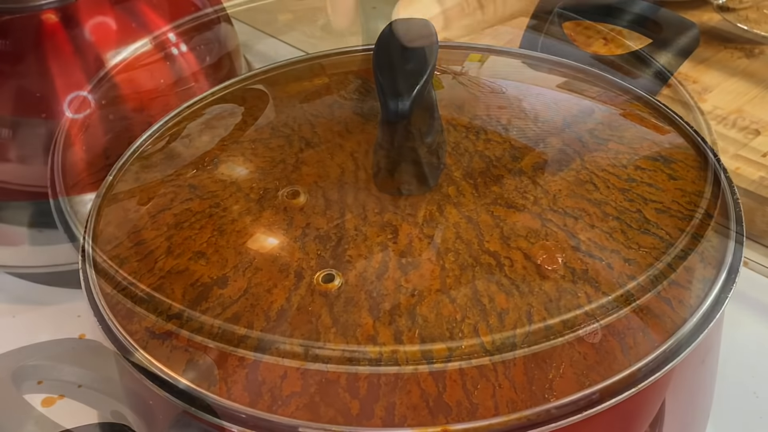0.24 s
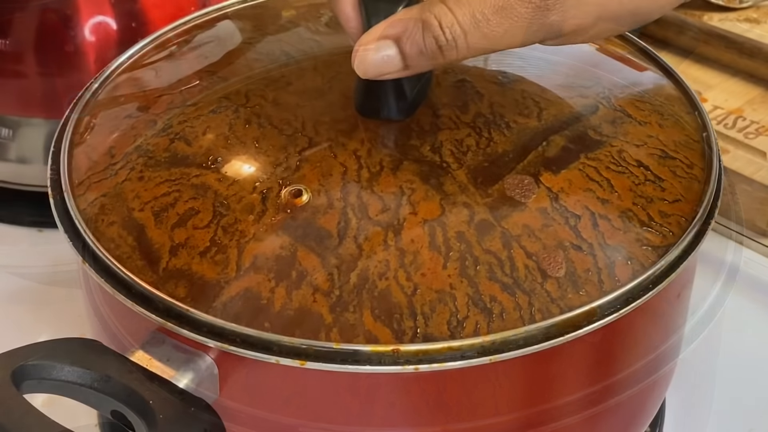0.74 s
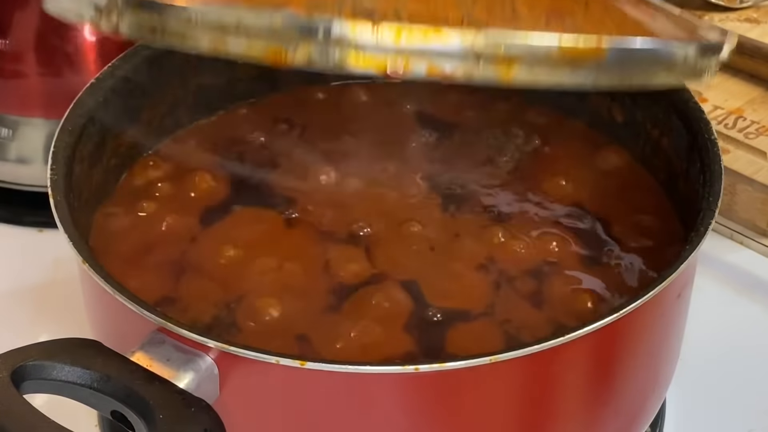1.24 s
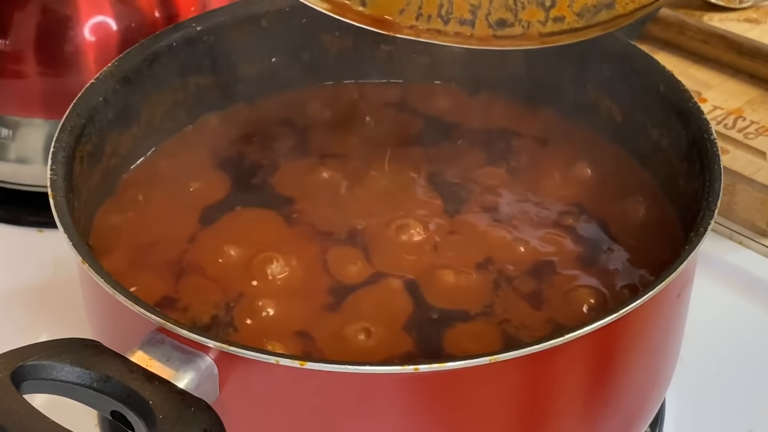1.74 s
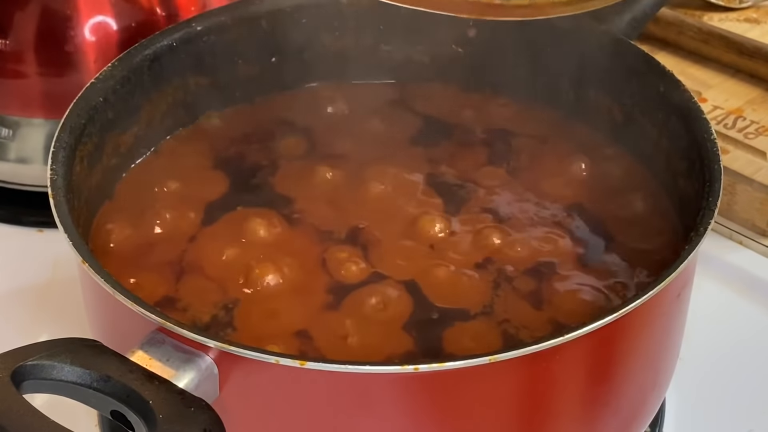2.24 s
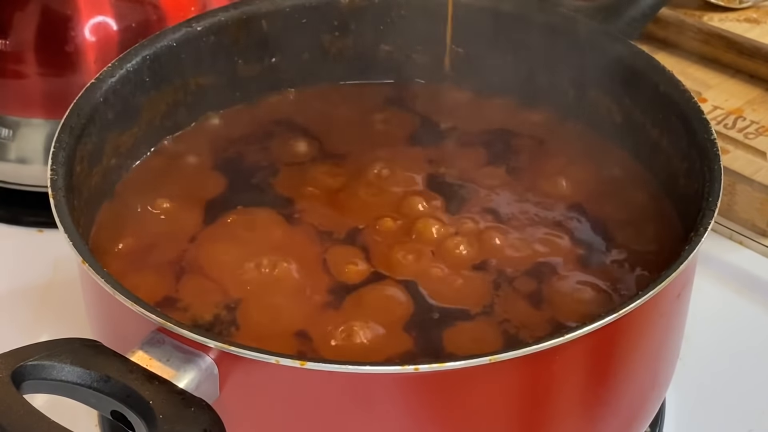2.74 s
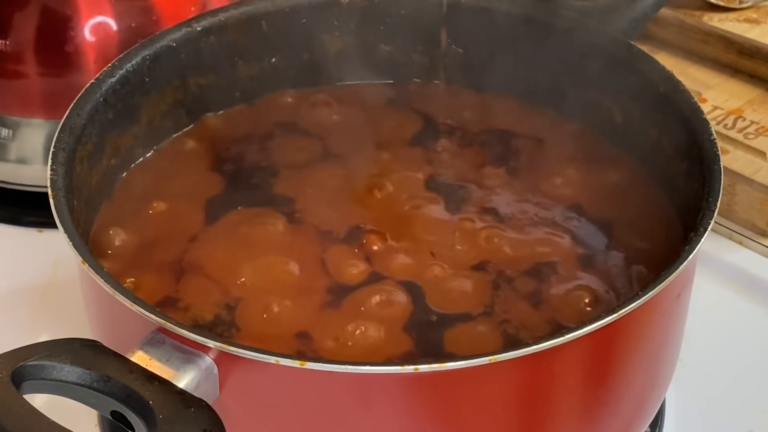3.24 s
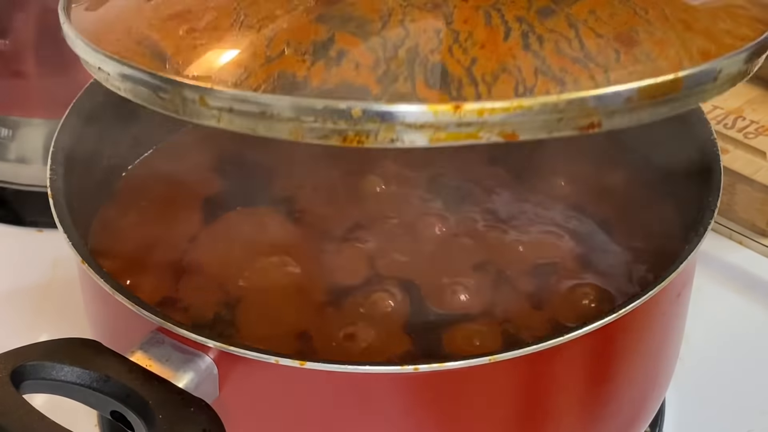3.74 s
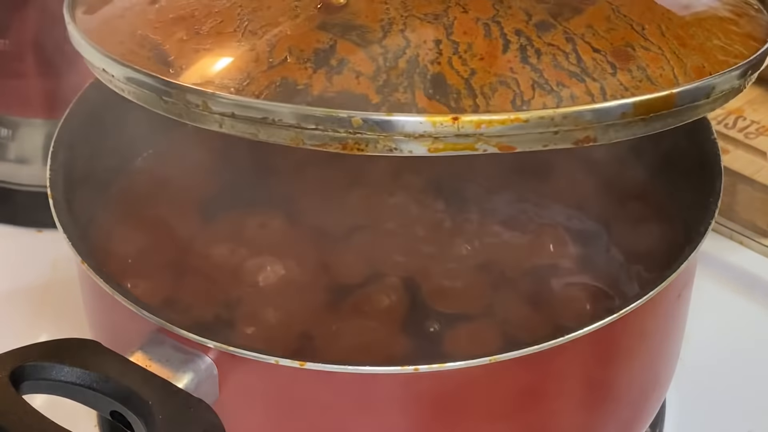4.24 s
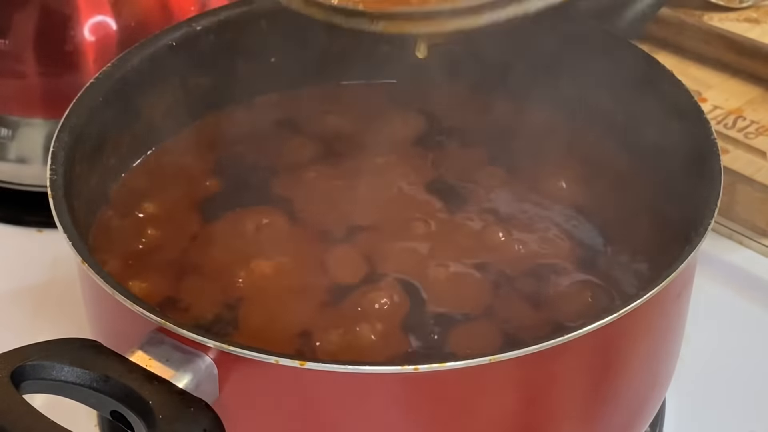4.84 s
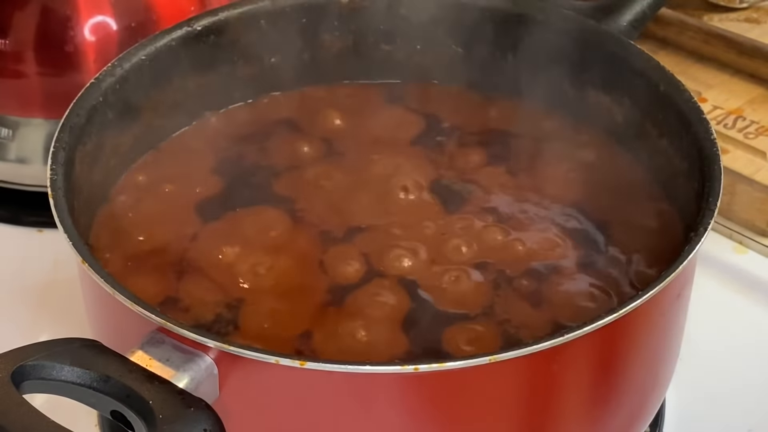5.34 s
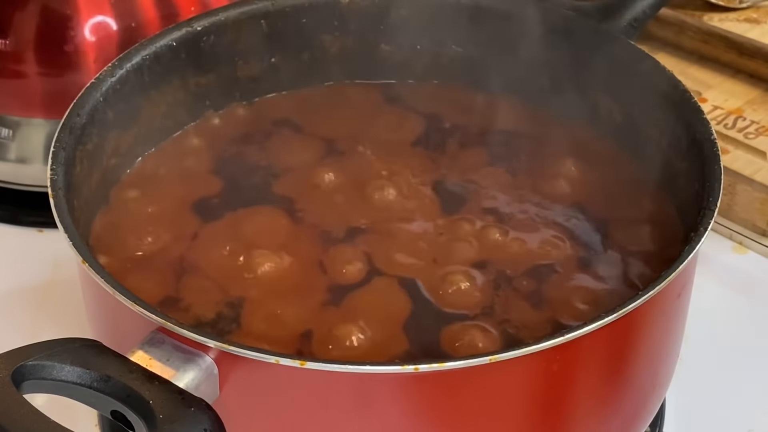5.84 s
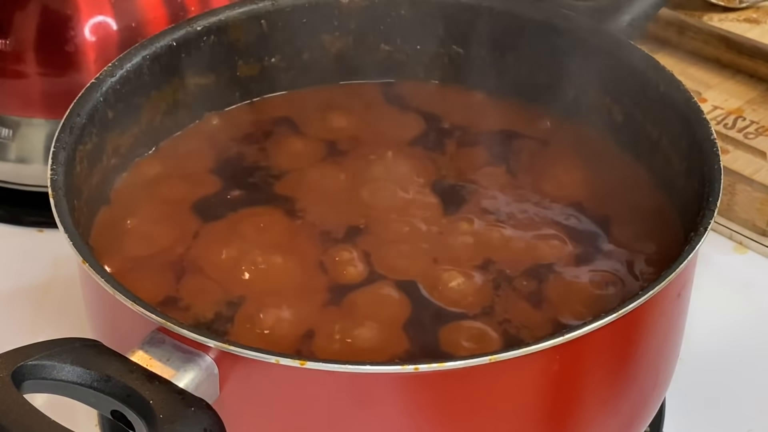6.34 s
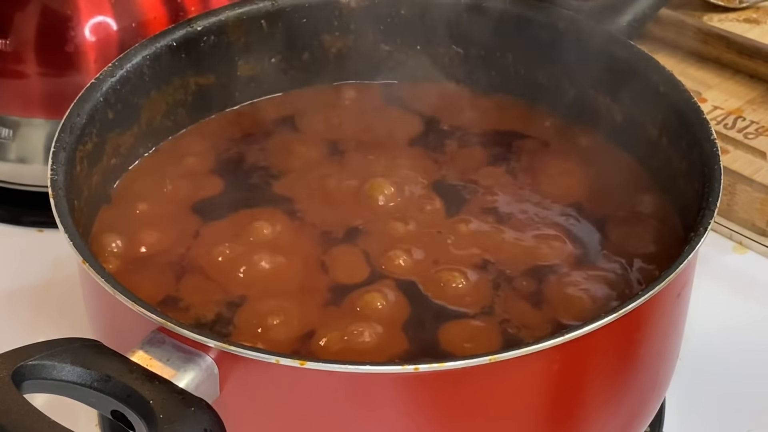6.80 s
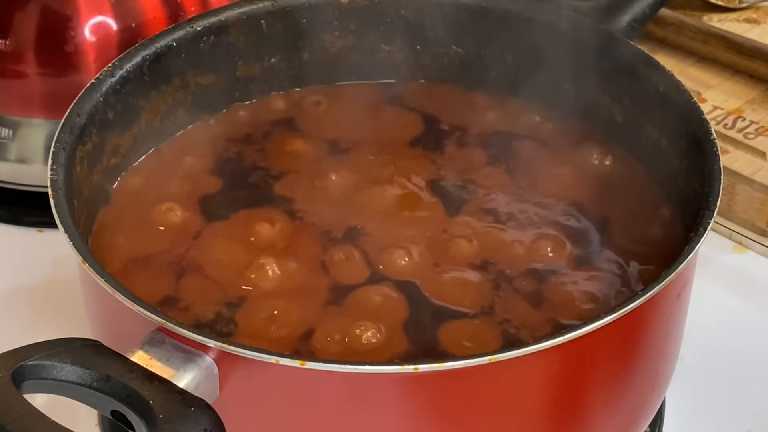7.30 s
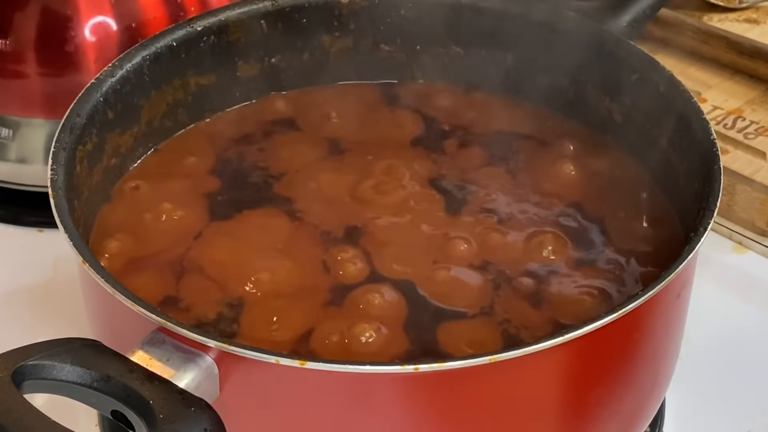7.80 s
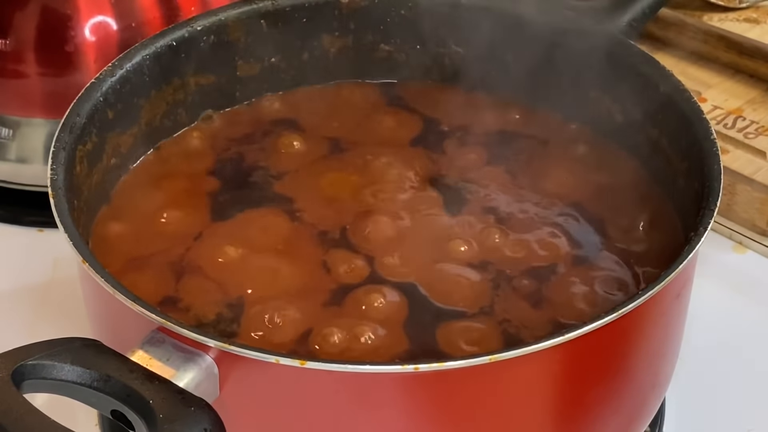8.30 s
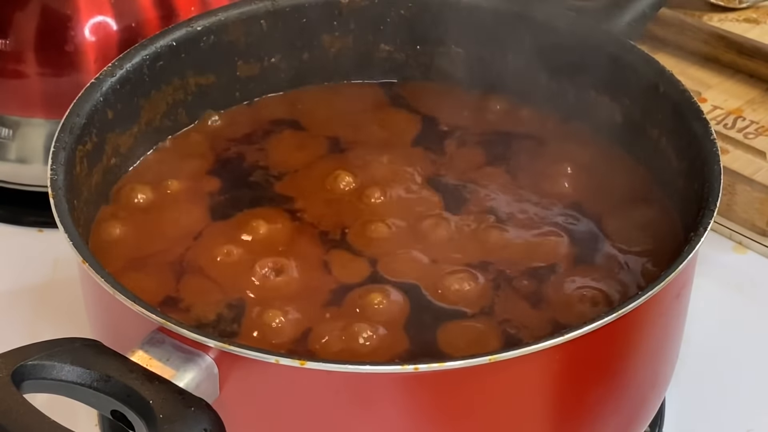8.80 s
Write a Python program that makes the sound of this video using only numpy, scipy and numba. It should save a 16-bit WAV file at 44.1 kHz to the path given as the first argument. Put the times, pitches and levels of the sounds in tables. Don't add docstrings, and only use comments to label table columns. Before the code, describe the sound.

In a quiet kitchen with low appliance hum, fingers tap a glass lid and its rim knocks lightly. The lid lifts with a soft low airy tone sliding upward, and a bright fizzing boil opens up, full of sharp pops, low plops and spitting drips. From about six seconds something knocks and rattles on a metal top, loudest near seven and a half, then only boiling remains. Close phone microphone, stereo.

```python
import sys
import numpy as np
from scipy import signal
from scipy.fft import rfft, irfft
from scipy.io import wavfile
from scipy.ndimage import uniform_filter1d
from numba import njit

SR = 44100
rng = np.random.default_rng(int(sys.argv[2]) if len(sys.argv) > 2 else 0)


def how_loud(loudness_db):
    steps = np.asarray(loudness_db, float) / 20
    return 10 ** steps


def master_out(mix):
    frames = np.transpose(np.atleast_2d(mix))
    ceiling = np.clip(frames, -1, 1)
    pcm = np.round(ceiling * 32767).astype(np.int16)
    wavfile.write(sys.argv[1], SR, pcm)


N = 399546
T, HZ = np.arange(N) / SR, np.arange(N // 2 + 1) * SR / N + 1

# (time [s], fizz level [dB])
BOIL_DB = [(0, -71), (.6, -89), (.985, -69.5), (1.005, -61), (1.16, -55), (1.7, -53.5), (2.2, -54.5),
           (2.7, -53.5), (3.6, -54.5), (4.2, -56.5), (4.6, -55), (6.5, -54), (6.9, -56), (9.06, -55.5)]
# (frequency [Hz], density [dB per Hz])
FIZZ_SPECTRUM = [(900, -35), (1500, 0), (2300, -12), (3600, 0.5), (5310, 16.5), (6750, 17), (12000, 2),
                 (16000, -45)]
# (time [s], peak [dB], pitch [Hz])
POPS = [(1.3397, -41, 5320), (1.453, -38, 3050), (1.7322, -40, 3970), (1.7916, -43, 4370),
        (1.956, -31.5, 4300), (2.616, -41, 3770), (2.681, -42, 5240), (2.7993, -38, 5500),
        (3.655, -39, 3380), (4.5485, -38, 3500), (4.8125, -41, 5180), (5.083, -48, 3650),
        (5.3671, -39, 3440), (5.947, -37, 5350), (6.0496, -55, 3640), (6.092, -42, 3540),
        (6.2711, -44, 5170), (6.521, -38, 4070), (6.626, -39, 3070), (7.2505, -38, 5340),
        (7.4525, -41, 5300), (7.514, -43, 3670), (7.5732, -35, 2720), (7.625, -29, 2800),
        (7.734, -34, 2990), (8.5318, -41.5, 4940), (8.6387, -38.5, 4360), (8.689, -46, 6360),
        (8.8592, -42, 4580)]
# (time [s], peak [dB], pitch [Hz])
PLOPS = [(1.289, -56, 1550), (1.502, -41.5, 1240), (1.58, -49.5, 1160), (1.966, -43, 2360),
         (2.045, -45.5, 940), (2.255, -45, 945), (2.363, -60, 930), (2.483, -59, 875), (2.568, -46.5, 2060),
         (2.721, -48, 1220), (2.94, -46.5, 1220), (3.048, -45, 880), (3.119, -41.5, 1850),
         (3.166, -46, 1290), (3.282, -45.5, 1105), (3.514, -43.5, 2050), (3.568, -48, 2140),
         (3.711, -51, 1520), (3.937, -43, 1950), (4.819, -50.5, 1610), (5.277, -46.5, 1350),
         (5.355, -49, 754), (5.566, -56, 1300), (5.714, -50, 1810), (5.941, -46, 1175),
         (6.055, -47.5, 1210), (8.209, -48, 910), (8.342, -44.5, 1230), (8.423, -44, 1270),
         (8.64, -49, 1340)]
# (time [s], peak [dB], pitch [Hz])
SMALL_POPS = [(1.2621, -39, 4880), (1.3841, -40, 5360), (1.5222, -40, 4930), (1.5843, -37, 6940),
              (1.6121, -39, 4530), (1.6226, -42, 3720), (1.6417, -48, 5070), (1.723, -37.5, 3430),
              (1.746, -38, 4360), (1.7673, -38, 6800), (1.805, -42, 5630), (1.828, -42, 3760),
              (1.866, -39, 5000), (1.8868, -38, 6270), (1.9074, -38, 5330), (1.9708, -34.5, 3720),
              (1.9988, -45, 5250), (2.0126, -37, 4500), (2.1051, -40.5, 6300), (2.1678, -37.5, 5140),
              (2.209, -43, 5000), (2.2624, -37, 5170), (2.2779, -35.5, 6620), (2.3328, -36, 5440),
              (2.369, -39.5, 3910), (2.42, -43, 5610), (2.4361, -39, 4650), (2.461, -42, 3770),
              (2.4726, -42, 5430), (2.4837, -39.7, 2900), (2.5865, -38, 5570), (2.696, -38, 4970),
              (2.73, -36, 4030), (2.7607, -43, 5740), (2.839, -44, 5940), (2.886, -47, 5120),
              (2.9735, -41, 5040), (3.0959, -45, 6900), (3.1957, -37, 6700), (3.2312, -37, 4970),
              (3.294, -39.2, 6200), (3.3098, -38, 5230), (3.3995, -40.5, 3520), (3.5274, -41, 5790),
              (3.9373, -40, 5500), (4.631, -40, 5290), (4.715, -41.5, 5250), (5.0255, -41, 5700),
              (5.146, -37, 6530), (5.3987, -41, 4180), (5.8633, -40.5, 3720), (6.0497, -43, 5460),
              (6.191, -41, 6310), (7.4784, -40, 5070), (8.133, -39, 5110), (8.1553, -42, 7200),
              (8.4392, -39, 6600), (8.616, -36, 7100), (8.7132, -36, 6300), (9.029, -37, 5930)]
# (time [s], peak [dB], pitch [Hz])
SMALL_PLOPS = [(1.1273, -55, 1500), (1.2882, -49.5, 1520), (1.4359, -44, 2460), (1.5953, -49, 1920),
               (1.6957, -50.5, 1010), (1.7579, -53, 910), (1.8138, -55, 890), (1.9338, -54, 860),
               (1.9899, -49.5, 895), (2.0797, -51, 1180), (2.2347, -52, 820), (2.3721, -48.5, 934),
               (2.4934, -48.5, 1075), (2.5341, -51, 820), (2.6062, -49.5, 750), (2.6316, -60, 980),
               (2.8091, -48.5, 840), (2.8325, -50.4, 910), (2.8548, -51, 1710), (2.9772, -49, 1570),
               (2.9982, -48, 2120), (3.0223, -49.5, 1360), (3.0835, -50, 1650), (3.1654, -49, 1360),
               (3.2261, -51, 1300), (3.3817, -52.0, 825), (3.4033, -50.5, 890), (3.4623, -50, 2130),
               (3.5414, -49, 1480), (3.5854, -48, 1430), (3.7089, -47, 1550), (3.7582, -51, 1310),
               (3.8994, -49, 1250), (4.0122, -51, 1290), (4.648, -51, 910), (4.818, -54, 1710),
               (4.9361, -51, 1270), (4.9546, -55, 770), (5.008, -53, 990), (5.0899, -45, 2560),
               (5.1883, -51, 865), (5.24, -53, 800), (5.5644, -44, 1310), (5.6238, -53, 970),
               (5.9604, -52, 1270), (6.1802, -50, 840), (6.8173, -60, 895), (6.8633, -50, 876),
               (8.0992, -46, 927), (8.3076, -52, 1330), (8.4217, -51, 1370), (8.6378, -47, 1320),
               (8.6751, -50, 855), (8.7415, -51, 1370), (8.859, -52, 1500)]
# (time [s], peak [dB])
SMALL_SPITS = [(1.3233, -50), (1.5837, -51), (1.9574, -42), (2.1879, -46), (2.3864, -45), (2.798, -41),
               (3.3173, -44), (3.6874, -47), (4.4008, -47), (6.5727, -37), (6.7684, -36), (7.171, -45),
               (7.251, -41), (7.566, -42), (8.0086, -45), (8.1164, -41), (8.3577, -43), (8.399, -40),
               (8.8058, -44)]
# (time [s], peak [dB])
DROP_TICKS = [(1.0978, -57), (1.3602, -44), (1.4625, -57), (1.6082, -56), (1.68, -58), (1.7314, -32),
              (1.8277, -48), (1.9649, -41), (2.0796, -51), (2.2712, -52), (2.6289, -48), (2.7167, -35),
              (2.7466, -38), (2.798, -36), (2.8838, -41), (2.9282, -51), (2.9671, -47), (3.1192, -57),
              (3.1976, -55), (3.2649, -55), (3.3173, -46), (3.4021, -60), (3.455, -56), (3.5632, -53),
              (3.9803, -62), (4.5375, -52), (4.8189, -56), (4.998, -61), (5.0703, -54), (5.2399, -60),
              (5.407, -50), (5.6305, -54), (6.1898, -52), (6.314, -54), (6.4457, -43), (6.4771, -53),
              (6.5026, -50), (6.5724, -55), (6.7684, -53), (6.9735, -62), (7.0318, -47), (7.2499, -48),
              (7.4828, -56), (7.5661, -46), (7.6245, -42), (7.7068, -49), (7.7328, -46), (7.9478, -58),
              (8.0431, -58), (8.087, -55), (8.1169, -42), (8.3419, -57), (8.3987, -54), (8.522, -50),
              (8.6023, -55), (8.6387, -53), (8.73, -58), (8.8053, -53)]
# (time [s], length [s], rise over usual spit [dB])
FLURRIES = [
    (1.72, .05, 9),
    (2.793, 0.14, 14),
    (4.553, 0.042, 18),
    (5.625, 0.099, 19),
    (6.5, 0.18, 9),
]
# (frequency [Hz], density [dB per Hz])
LEAK_SPECTRUM = [(1180, -37), (2000, -1), (2300, -5.5), (2460, -23), (3940, -6), (12000, -21.5),
                 (13800, -13), (16000, -19)]
# (time [s], resonance [Hz], level [dB])
LID_GAP = [
    (.88, 140, -66),
    (.93, 175, -54),
    (1.0, 310, -57),
    (1.08, 500, -66),
    (1.17, 600, -69),
    (1.24, 660, -78),
]
# (time [s], peak [dB])
LID_TICKS = [
    (0.4556, -49),
    (0.55, -51),
    (0.6714, -57),
    (0.698, -46.5),
    (0.762, -58),
    (0.792, -47.5),
    (0.877, -49),
]
# (time [s], peak [dB], pitch [Hz], ring [cycles])
LID_PINGS = [
    (0.6702, -36, 3870, 2.4),
    (.671, -39.5, 1510, 0.98),
    (0.698, -52, 3300, 6),
    (0.763, -46, 3400, 6.2),
    (.792, -53, 3700, 5),
    (.876, -49, 3660, 35),
    (0.877, -57, 2960, 14),
    (.921, -55, 2600, 6),
]
# (time [s], peak [dB], brightness [dB])
KNOCKS = [(5.631, -39, -18), (6.314, -23.5, 3), (6.358, -25, 1.5), (6.399, -33, -28), (6.479, -23.5, -6),
          (6.517, -22, 3.5), (6.617, -29, 7), (6.973, -28.5, 13.5), (7.407, -22.5, -7), (7.566, -16.5, 6.5),
          (7.569, -13.5, -20), (7.625, -26, 14), (7.656, -24, 14), (7.706, -18, 9.5), (7.734, -19, 0),
          (7.993, -38.5, 14), (8.101, -61, 4)]
# (start [s], hold [s], level [dB], brightness [dB])
RATTLES = [(5.612, 0.03, -49, 6), (6.08, 0.21, -66.5, 16.5), (6.301, 0.1, -35, -6), (6.41, 0.21, -51, -17),
           (6.519, 0.038, -26.5, -6.5), (6.609, 0.068, -35, -5), (6.805, 0.16, -46, -5),
           (6.937, 0.036, -33.5, -19), (6.977, 0.044, -30.5, -2.5), (7.424, 0.16, -52.5, 2),
           (7.564, 0.023, -15.5, -2), (7.625, 0.12, -21.5, 0), (7.989, 0.0092, -40.5, 1)]
# (frequency [Hz], density [dB per Hz])
CLATTER_SPECTRUM = [(21, -57), (35, -20), (70, -5.5), (140, 0.5), (185, -2.5), (301, -11), (478, -1.5),
                    (778, -5.5), (979, 0.5), (1230, -9.5), (1400, -4.5), (5890, -37.5), (12100, -55),
                    (14100, -60), (16000, -43)]
# (frequency [Hz], level [dB], t60 [s])
PANEL_MODES = [(75.2, 2.5, 0.28), (100, 2.5, 0.11), (189.7, -8, 0.45), (249, -5, 0.089), (301, -28, 0.72),
               (379, -2.5, 0.067), (433.5, -9.5, 0.54), (472, -6.5, 0.26), (594, -3.5, 0.066),
               (949, -8.5, .3), (1060, -14, 0.21), (1334, -6, 0.3), (1470, -18, .3), (1550, -15, .15),
               (1782, -2.5, 0.22), (1866, -11, 0.24)]
# (time [s], peak [dB])
PANEL_RINGS = [
    (6.36, -33.5),
    (7.017, -40),
    (7.429, -40.5),
    (7.8, -37),
]
# (time [s], peak [dB], frequency [Hz], t60 [s])
CLANGS = [(6.316, -41, 571, 0.25), (6.315, -44, 900, .15), (6.316, -42, 1250, 0.17), (6.316, -50, 1860, .1),
          (6.359, -34.5, 567, 0.23), (6.359, -46, 914, .15), (6.477, -48, 2270, .04),
          (6.477, -40, 1300, .05), (6.518, -33, 568, 0.39), (6.518, -35, 937, 0.4),
          (6.517, -32, 1063, 0.13), (6.519, -40, 1870, 0.2), (6.529, -31.5, 207, .2),
          (6.532, -36, 1305, .1), (6.618, -38, 432, 0.4), (6.618, -44, 923, 0.53), (6.618, -43, 1093, 0.33),
          (6.618, -54, 1430, .2), (6.974, -34, 1060, 0.28), (6.973, -35, 914, 0.22),
          (6.973, -41, 1530, .15), (6.974, -48, 1900, .12), (6.985, -34, 575, .15), (7.09, -38, 920, .06),
          (7.412, -39, 429, 0.25), (7.412, -48, 637, 0.1), (7.568, -27, 1820, 0.31), (7.568, -31, 1055, .1),
          (7.577, -16, 195, 0.34), (7.578, -16, 377.5, 0.26), (7.578, -37, 613, 0.25),
          (7.626, -31, 1006, 0.25), (7.626, -22.5, 958, 0.46), (7.626, -29, 1526, 0.52),
          (7.626, -24, 1308, 0.15), (7.626, -27, 1790, .2), (7.655, -25, 1040, 0.27),
          (7.655, -29, 1437, 0.38), (7.66, -29.5, 430, 0.41), (7.676, -22, 1424, 0.18),
          (7.707, -23.5, 958, 0.24), (7.707, -29.5, 1370, 0.24), (7.72, -25, 472, 0.22),
          (7.733, -26, 188.4, 0.37), (7.733, -35.5, 1724, 0.33), (7.786, -35, 624, 0.15),
          (7.76, -37.5, 306, 0.62), (7.579, -21, 287, .2), (7.995, -40.5, 940, 0.061),
          (7.994, -47, 474, 0.12)]
# (frequency [Hz], density [dB per Hz])
RUMBLE_SPECTRUM = [(15, -26), (25, -27), (48, 2), (69, -2), (129, -7.5), (193, -2), (430, -12), (525, -8.5),
                   (642, -11.5), (709, -9.5), (1040, -17.5), (1490, -17.5), (1750, -22.5), (2560, -26),
                   (3000, -20), (3900, -49), (6600, -60)]
# (time [s], level [dB])
RUMBLE_DB = [(0, -58.5), (.4, -62.5), (.9, -59.5), (3.5, -58.5), (7.3, -58), (8.2, -57.5), (9.06, -58)]
# (frequency [Hz], width [Hz], level [dB])
HUM = [(62.2, 24, -58.5), (118.15, 8.1, -65), (180.5, 27, -66.5), (1580, 6.8, -77.5)]
# (frequency [Hz], lead [half turns])
PORT_LEAD = [(0, 0), (1800, -.1), (2300, 0), (3500, .18), (5800, 0), (7200, -.25), (8500, -1), (10100, -2),
             (11850, -2.95), (12350, -3.08), (14000, -4), (15900, -5), (17500, -6)]
# (frequency [Hz], likeness [0-1])
ALIKE = [(60, .997), (130, 0.975), (220, 0.94), (330, 0.74), (640, 0.59), (1400, 0.6), (2300, 0.89),
         (6000, 0.85), (16000, 0.83)]

PLOP_CYCLES, PLOP_GLIDE = 9.5, .6


def level(x, db):
    return x * how_loud(db) / np.sqrt(np.mean(x ** 2))


def curve(rows):
    s, *columns = np.transpose(rows)
    return [np.interp(T, s, c) for c in columns]


def over_hz(points):
    hz, value = np.transpose(points)
    return np.interp(np.log(HZ), np.log(hz + 1), value)


def colour(x, gain):
    return irfft(rfft(x, N) * gain, N)


def band(x, lo_hz, hi_hz):
    return signal.sosfilt(signal.butter(2, [lo_hz, hi_hz], "band", fs=SR, output="sos"), x)


def walk(rate_hz):
    k = int(SR / rate_hz)
    steps = np.repeat(rng.standard_normal(N // k + 1), k)
    return 1.36 * uniform_filter1d(uniform_filter1d(steps, k), k)[:N]


def diffuse(size=N):
    mid, side = np.pad(rng.standard_normal((2, size)), ((0, 0), (0, N - size)))
    alike = np.clip(over_hz(ALIKE), 0, 1)
    mid, side = colour(mid, np.sqrt(1 + alike)), colour(side, np.sqrt(1 - alike))
    return np.array([mid + side, mid - side]) / 2


@njit
def bubbles(count, s, hz, size, cycles, glide):
    y = np.zeros(count)
    for k in range(len(s)):
        span = cycles[k] * SR / hz[k]
        phase, i0 = 0., int(s[k] * SR)
        for i in range(min(int(3 * span), count - i0)):
            u = i / span
            phase += 2 * np.pi * min(hz[k] * (1 + glide * u) / SR, .45)
            y[i0 + i] += size[k] * 4 * np.sqrt(u) * np.exp(-3 * u) * np.sin(phase)
    return y


def swarm(rate_hz, lo_hz, hi_hz, cycles, spread_db, glide):
    when, pitch, rarity, length = rng.random((int(rate_hz * N / SR), 4)).T
    bunch = how_loud(1.8 * np.clip(walk(12), -2, 2))[(when * N).astype(int)]
    size = how_loud(-spread_db * np.log(1.01 - rarity)) * bunch * np.sin(np.pi * pitch)
    hz = lo_hz * (hi_hz / lo_hz) ** pitch
    return level(bubbles(N, when * N / SR, hz, size, cycles * (.5 + length), glide), 0)


def single(rows, cycles, glide, trim_db):
    s, db, hz = np.transpose(rows)
    return bubbles(N, s, hz / (1 + glide / 5), how_loud(db + trim_db), cycles + 0 * s, glide)


def at_pitch(rows, hz):
    return [(row[0], row[1], hz) for row in rows]


def spray(rows, cycles, glide, trim_db, count):
    s, db, hz = np.repeat(rows, count, axis=0).T
    delay, detune = rng.random((len(s), 2)).T
    spray_s = .004
    rows = np.transpose([s + spray_s * delay, db - 6 * delay, hz * 1.6 ** (detune - .5)])
    return single(rows, cycles, glide, trim_db)


def simmer():
    fizz = swarm(1100, 2400., 10500., 7., 2.8, .25)
    fizz += how_loud(-2.5) * swarm(340, 2100., 8500., 13., 3.1, .4)
    fizz += how_loud(-15) * swarm(150, 800., 2740., 5.5, 3.9, .53)
    fizz += how_loud(-8) * swarm(130, 2200., 11600., 2.2, 2., .1)
    fizz += how_loud(-17) * swarm(48, 675., 1610., PLOP_CYCLES, 1., PLOP_GLIDE)
    bursts = swarm(600, 14000., 17000., .6, 3.2, .03)
    spits = swarm(260, 6000., 17500., 4., 4., .2)
    steam = rng.standard_normal(N) * how_loud(.91 * walk(25) + 7.8 * walk(120))
    hiss = level(colour(how_loud(-10) * steam + bursts, how_loud(over_hz(FIZZ_SPECTRUM))), -5)
    spit_db = -21 + sum(db * np.exp(-((T - s) / length) ** 2) for s, length, db in FLURRIES)
    treble = level(band(how_loud(-7) * steam + spits, 4200, 21000), -1.5)
    treble = treble * how_loud(spit_db + 1.8 * walk(24) + .5)
    fizz_db, = curve(BOIL_DB)
    return how_loud(fizz_db) * (how_loud(-1.5) * fizz + band(hiss, 730, 21000) + treble)


def pops():
    sharp = single(POPS, 4.2, .036, 4.6) + single(at_pitch(POPS, 7000), 8., .37, 1.)
    small = single(SMALL_POPS, 9.2, .52, -1.6)
    return sharp + small + spray([*POPS, *SMALL_POPS], 4.4, .19, -.99, count=4)


def plops():
    big = single(PLOPS, PLOP_CYCLES, PLOP_GLIDE, -.96) + single(PLOPS, .68, .21, 3)
    return big + single(SMALL_PLOPS, PLOP_CYCLES, PLOP_GLIDE, -.18)


def spitting_drops():
    ticks = single(at_pitch(DROP_TICKS, 13000), 2.2, .044, 11)
    return ticks + single(at_pitch(SMALL_SPITS, 10000), 9.6, .1, 1.5)


def lid_ticks():
    hits = np.zeros(N)
    for s, db in LID_TICKS:
        hits[int(s * SR)] = how_loud(db - 3)
    rasp_t60_s = .12
    rasp = band(rng.standard_normal(SR // 10), 470, 8500)
    rasp = rasp * np.exp(-np.log(1000) * T[:SR // 10] / rasp_t60_s)
    glass = sum(single([(s, db, hz)], cycles, .03, 0) for s, db, hz, cycles in LID_PINGS)
    return colour(hits, rfft(rasp, N)) + glass


def lid_leak():
    hiss = level(colour(rng.standard_normal(N), how_loud(over_hz(LEAK_SPECTRUM))), -69.5)
    return hiss * how_loud(2.9 * walk(20) * (T > LID_GAP[2][0]))


def lid_air():
    hz, db = curve(LID_GAP)
    wobble = (1.1 + .8 * walk(120)) * np.cos(2 * np.pi * np.cumsum(hz) / SR)
    return wobble * how_loud(db) * (T > LID_GAP[0][0]) * (T < LID_GAP[-1][0])


def shaking():
    low, high, thud, crack = np.zeros((4, N))
    attack_s, fall_db_s, treble_extra_fall_db_s = .011, 147, 32
    for s, hold, db, bright_db in RATTLES:
        rise, past = np.clip((T - s) / attack_s, 0, 1), np.maximum(T - s - hold, 0)
        shake = rise * how_loud(db - fall_db_s * past)
        low += shake * how_loud(-7)
        treble = how_loud(bright_db - 5.5 - treble_extra_fall_db_s * past)
        high += (T > s) * shake / np.maximum(rise, .2) * treble
    thud_db, thud_s, crack_db = 1.5, .00097, 6.5
    bass_rise_s, bass_late_s = .0088, .00824
    for s, db, bright_db in KNOCKS:
        s = s + .0015
        after = np.maximum(T - s, 0)
        late = np.maximum(after - bass_late_s, 0)
        thud += how_loud(db + thud_db) * late / thud_s * np.exp(-late / thud_s)
        crack[int(s * SR) - 40] += how_loud(db + bright_db + crack_db)
        low += (1 - np.exp(-after / bass_rise_s)) * how_loud(db - 7) * np.exp(-after / .032)
        fall = .77 * np.exp(-after / .00055) + .16 * np.exp(-after / .016)
        high += (T > s) * how_loud(db + bright_db - 10) * fall
    return low, high, thud, crack


def clangs():
    y, t = np.zeros((2, N + SR)), T[:SR // 2]
    attack_s, skew_rad = .0019, .43
    for (s, db, hz, t60), skew in zip(CLANGS, skew_rad * rng.standard_normal(len(CLANGS))):
        fade = (1 - np.exp(-t / attack_s)) * np.exp(-np.log(1000) * t / max(t60, .02))
        step = np.array([[skew], [-skew]]) * min(hz / 500, 1)
        y[:, int(s * SR):][:, :len(t)] += how_loud(db) * fade * np.sin(2 * np.pi * hz * t + step)
    return y[:, :N]


def clatter():
    low, high, thud, crack = shaking()
    grit = diffuse() * how_loud(2.2 * walk(220))
    split_hz, max_cycles = 850, 170
    split = 1 / (1 + 1j * HZ / split_hz) ** 3
    drive = rfft(grit * low - thud * how_loud(-12)) * split
    drive = drive + rfft(grit * high + crack) * (1j * HZ / split_hz) ** 3 * split * how_loud(1)
    s = 2j * np.pi * HZ
    drive = drive * (s / (s + 2 * np.pi * 55)) ** 2
    folded = irfft(over_hz(CLATTER_SPECTRUM) * np.log(10) / 20, N)
    causal = np.exp(rfft(folded * (T < T[N // 2]) * (1 + (T > 0))))
    modes = 0
    for hz, db, t60 in PANEL_MODES:
        decay = np.log(1000) / min(t60, max_cycles / hz)
        modes = modes + how_loud(db) * 60 / (s + decay - 2j * np.pi * hz)
    ring = single(at_pitch(PANEL_RINGS, 187), 40, 0., 0)
    return irfft(drive * (how_loud(17.5) * causal + how_loud(20.5) * modes), N) + ring + clangs()


def kitchen():
    noise = level(colour(diffuse(), how_loud(over_hz(RUMBLE_SPECTRUM))), 0)
    rumble = 0
    for hz in 20 * 2 ** np.arange(8.):
        rumble = rumble + colour(noise, np.exp(-np.log2(HZ / hz) ** 2 * 2)) * how_loud(1.2 * walk(9))
    hum = sum(level(colour(diffuse(), 1 / (1 + ((HZ - f) / w * 2) ** 2)), db) for f, w, db in HUM)
    db, = curve(RUMBLE_DB)
    return rumble * how_loud(db - .5) + hum * how_loud(db - np.median(db))


def scene():
    pot = simmer() + pops() + plops() + spitting_drops() + lid_ticks() + lid_leak()
    lead = np.exp(.5j * np.pi * over_hz(PORT_LEAD))
    ports = np.array([lead, 1 / lead])
    tail_t60_s = .06
    tail = diffuse(size=SR // 2) * np.exp(-np.log(1000) * T / tail_t60_s) * how_loud(-29)
    walls = colour(tail, rfft(pot) / (1 + (HZ / 9000) ** 2))
    return colour(pot, ports) + walls + lid_air() + colour(clatter(), ports) + kitchen()


def low_pass(x):
    return signal.sosfilt(signal.butter(12, 16510, fs=SR, output="sos"), x)


def record(dry):
    mix = signal.sosfilt(signal.ellip(8, .5, 60, 16000, fs=SR, output="sos"), dry)
    mix = signal.sosfilt(signal.butter(2, 42, "high", fs=SR, output="sos"), mix)
    return low_pass(mix)


dry = scene()
out = record(dry)
master_out(out)
```